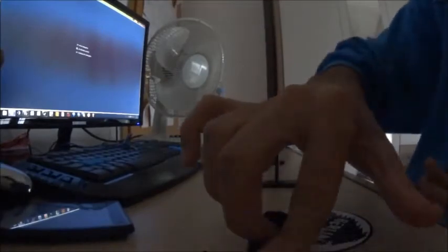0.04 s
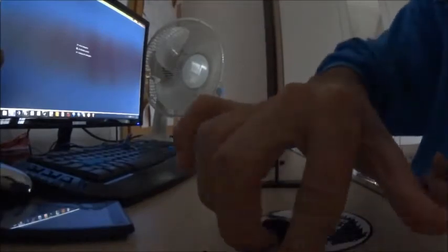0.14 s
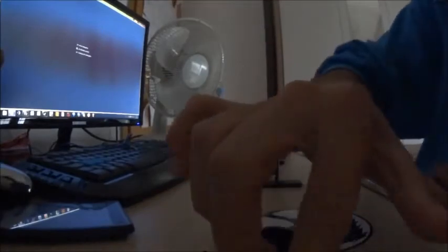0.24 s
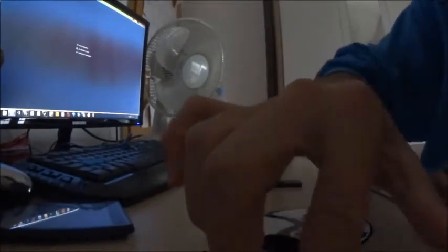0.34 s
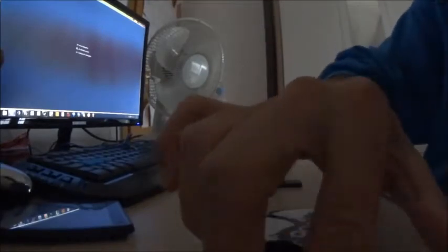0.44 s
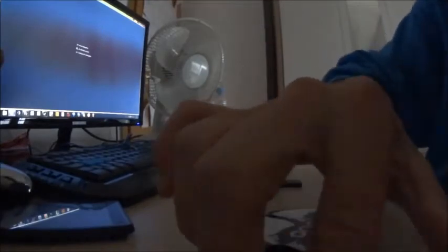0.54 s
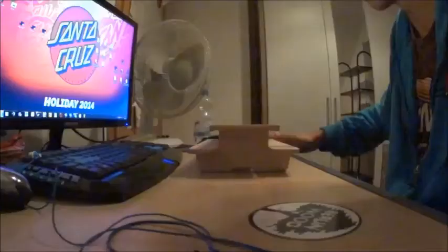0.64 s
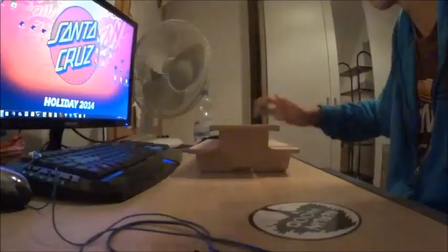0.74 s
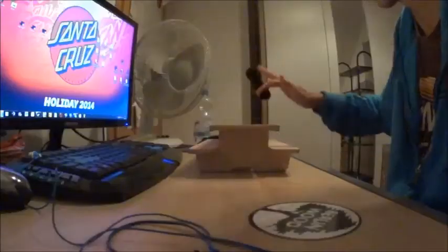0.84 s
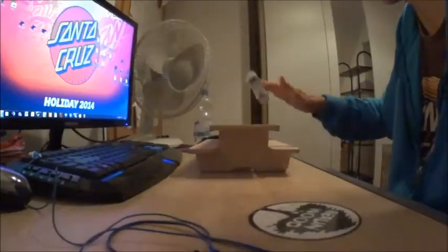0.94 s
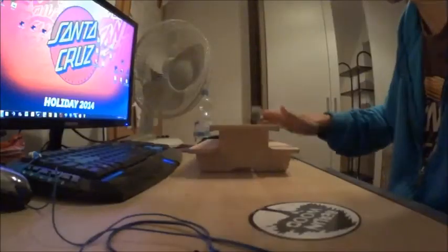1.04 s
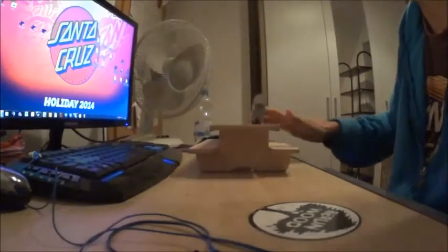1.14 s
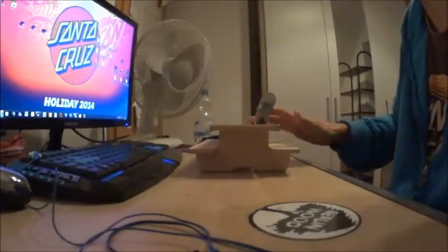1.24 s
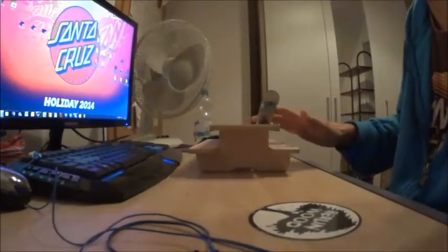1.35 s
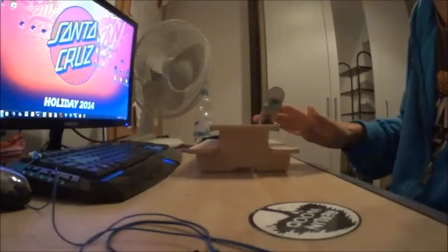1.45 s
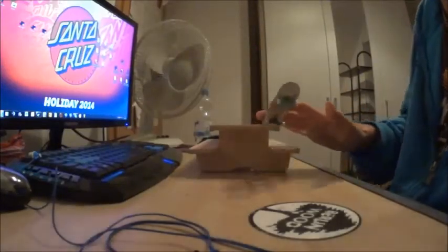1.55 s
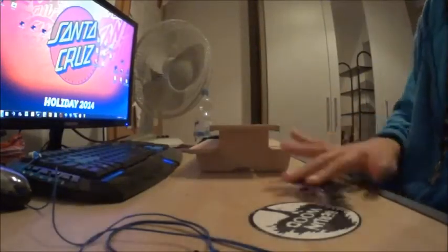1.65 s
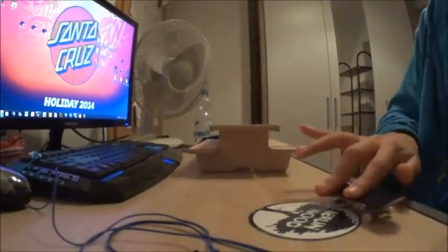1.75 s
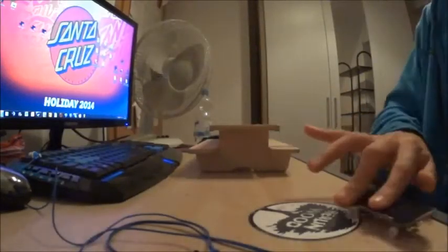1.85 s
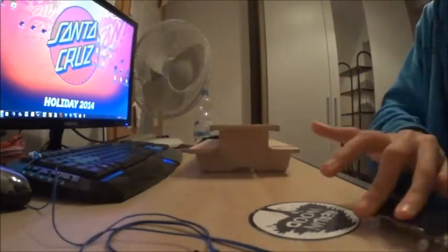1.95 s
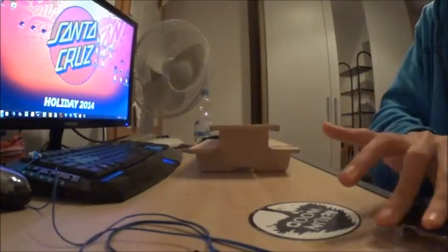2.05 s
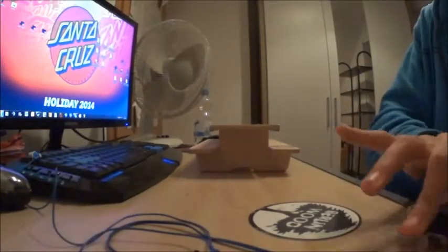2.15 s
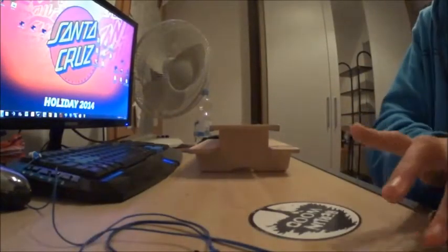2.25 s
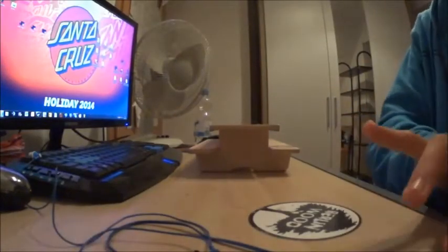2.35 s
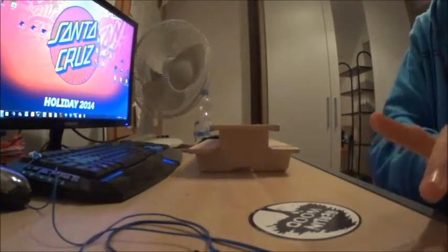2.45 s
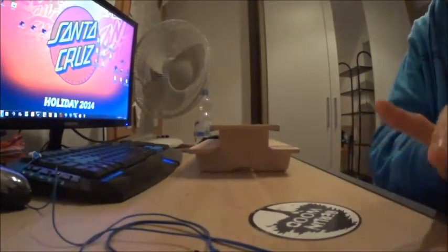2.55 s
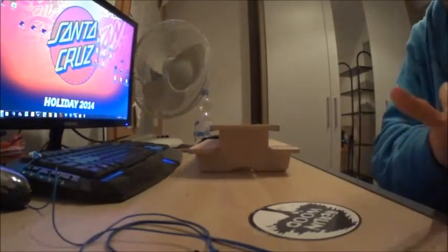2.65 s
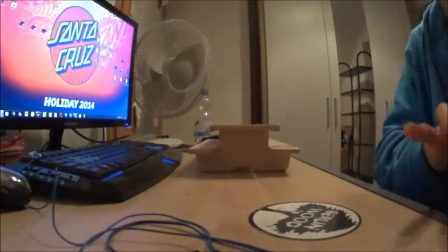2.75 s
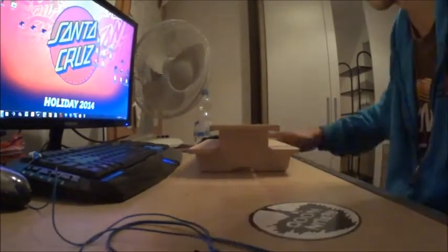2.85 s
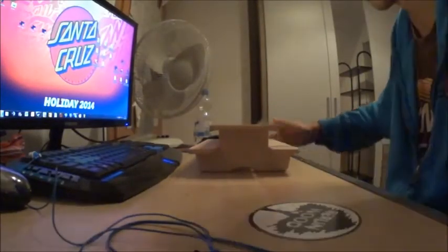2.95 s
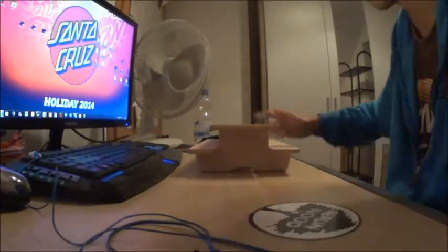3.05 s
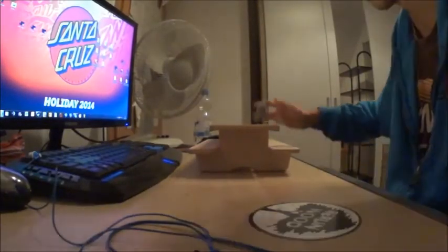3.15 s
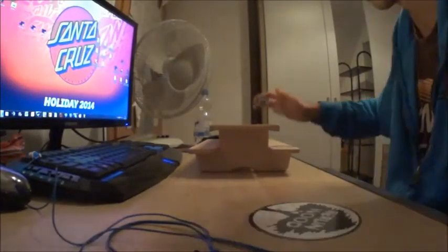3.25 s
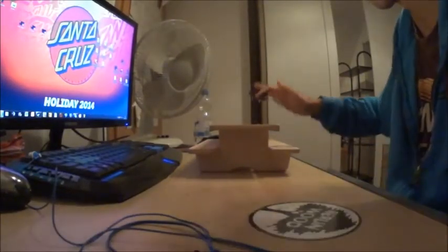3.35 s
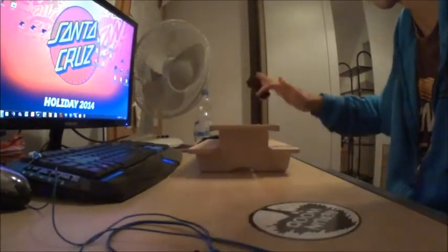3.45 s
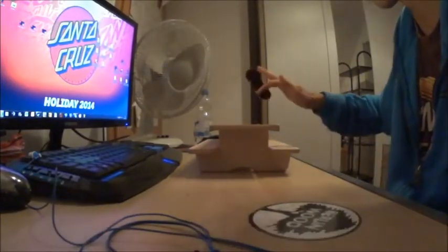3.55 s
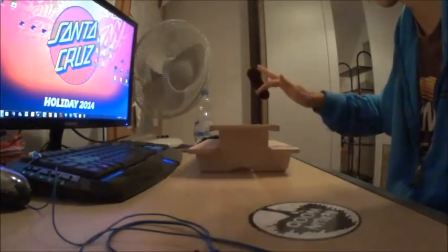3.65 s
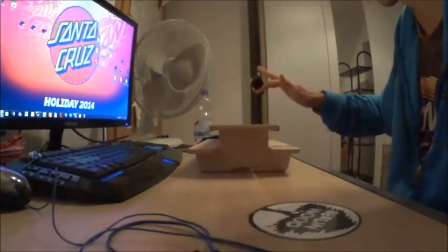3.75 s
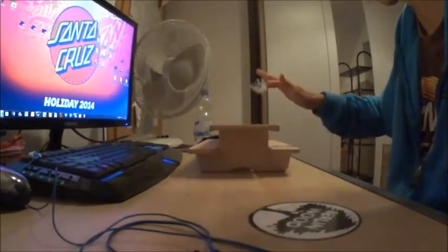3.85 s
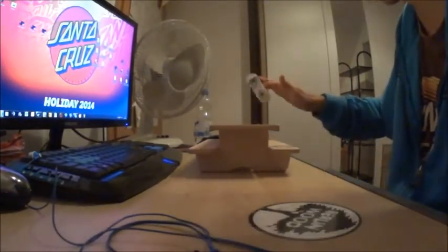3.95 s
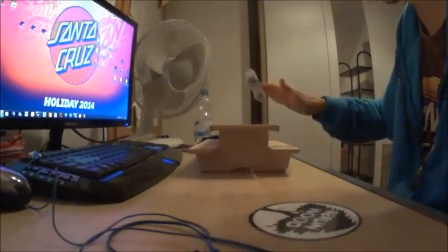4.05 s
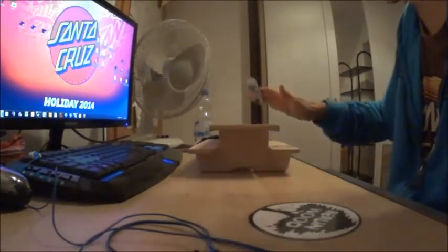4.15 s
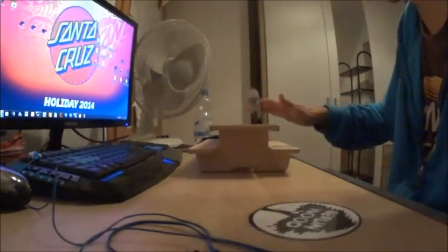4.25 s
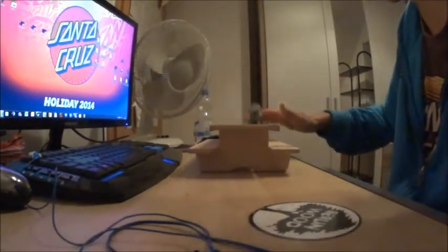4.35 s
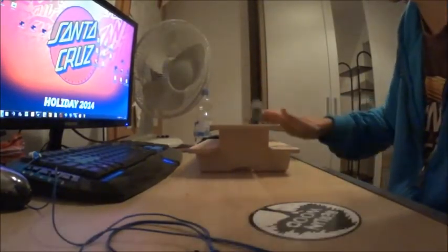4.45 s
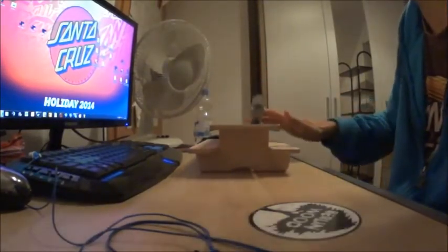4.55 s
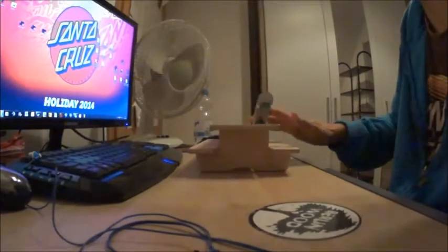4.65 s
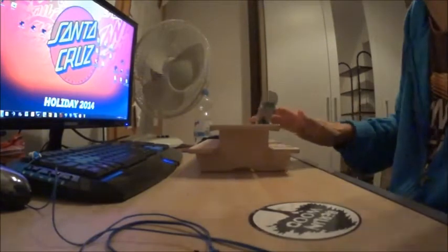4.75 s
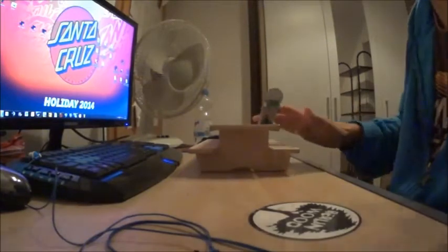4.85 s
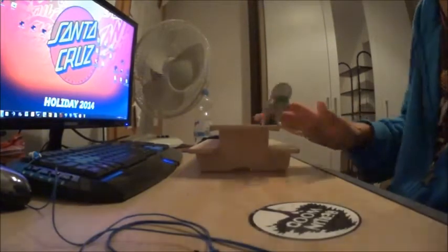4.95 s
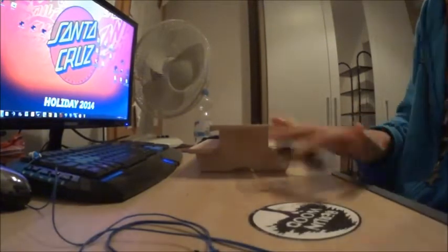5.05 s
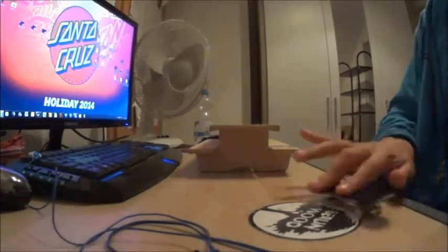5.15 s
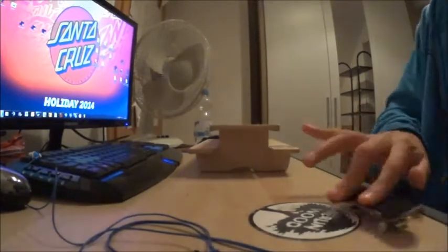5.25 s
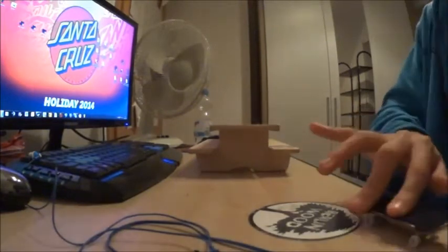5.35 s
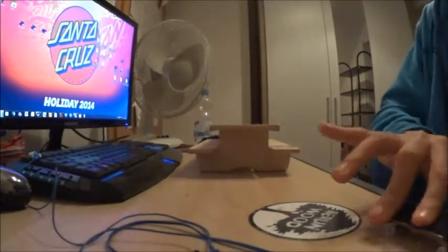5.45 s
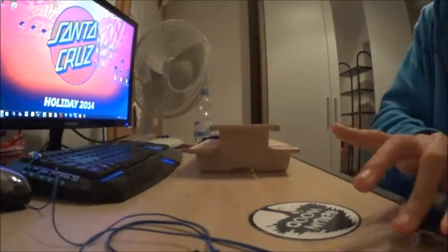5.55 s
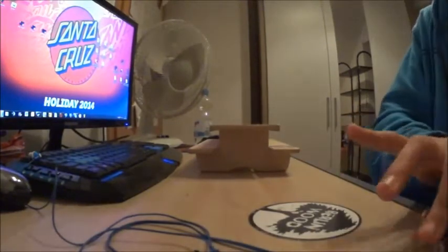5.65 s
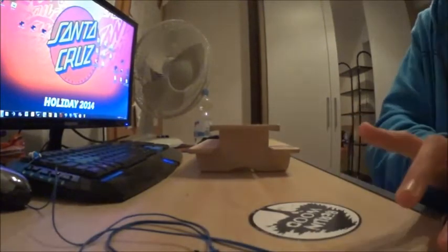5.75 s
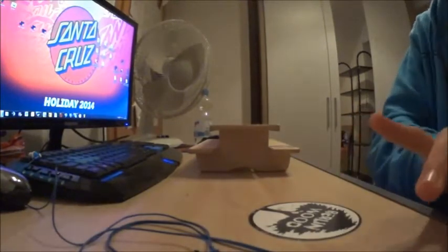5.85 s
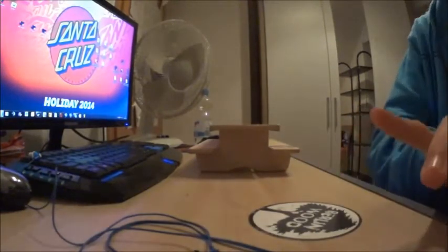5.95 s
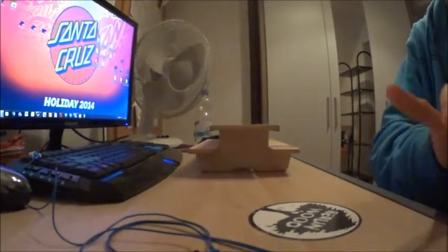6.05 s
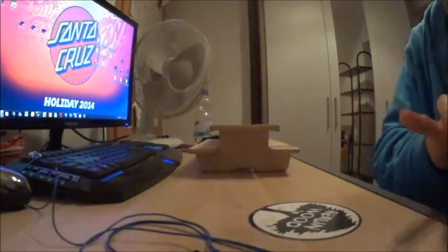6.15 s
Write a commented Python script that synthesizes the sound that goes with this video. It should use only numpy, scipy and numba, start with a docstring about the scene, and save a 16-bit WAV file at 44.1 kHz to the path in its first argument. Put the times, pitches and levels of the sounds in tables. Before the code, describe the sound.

A tiny finger skateboard hums close by on a wooden desk, then cracks, grinds and lands, before the blows repeat in deep slow motion.

```python
"""A finger skateboard on a wooden desk in a bedroom. The dying tail of an earlier blow opens; then the board rolls
close by: it hums, its bearings hiss and tick. After a cut it is popped onto a small wooden ledge, clacks, slides and
grinds off, lands and rolls away until a finger squeaks on it. An edit then repeats the first blows at quarter speed
and the rest at full speed. Blows are cracks and decaying modes; rolling, sliding and scraping are uneven noise through
resonances. A camera's limiter flattens the blows, so that the room swells behind them."""
import sys
import numpy as np
from scipy import signal
from scipy.fft import rfft, irfft
from scipy.io import wavfile
from scipy.ndimage import uniform_filter1d, minimum_filter1d
from numba import njit

SR = 44100
rng = np.random.default_rng(int(sys.argv[2]) if len(sys.argv) > 2 else 0)


def bounce(signal):
    """Save signal as a 16-bit WAV file at the path given by the first command-line argument."""
    frames = np.transpose(np.atleast_2d(signal))
    limited = np.clip(frames, -1, 1)
    pcm = np.round(limited * 32767).astype(np.int16)
    wavfile.write(sys.argv[1], SR, pcm)


N = 273861  # samples in the finished sound
LENGTH = 131072  # samples in the scene before the edit repeats parts of it

# Rumbling resonances of the desk. Each row: pitch in Hz, width in Hz, relative level in dB.
DESK_RUMBLE = [(102, 22, 2), (204, 57, 7), (319.5, 215, 12)]


def undb(db):
    """Turn decibels into a plain amplitude factor."""
    return 10 ** (np.asarray(db) / 20)


def unit(x):
    """Scale a sound to an rms (average strength) of 1."""
    return x / np.sqrt(np.mean(x ** 2))


def resonate(x, peaks):
    """A body favours some pitches: add up steep resonances (each passed twice), rms 1."""
    out = 0
    for hz, width, db in peaks:
        band = signal.iirpeak(hz, hz / width / 1.5, SR)
        twice = signal.lfilter(*band, signal.lfilter(*band, x))
        out = out + undb(db) / np.sqrt(width) * twice
    return unit(out)


def grit(lump_db, lump_hz=120):
    """Dense rough contact: noise whose force comes in short uneven lumps."""
    hold = int(SR / lump_hz)
    steps = np.repeat(rng.standard_normal(LENGTH // hold + 1), hold)
    lumps = uniform_filter1d(steps, hold)[:LENGTH]
    return rng.standard_normal(LENGTH) * undb(lump_db * lumps)


def strokes(rows):
    """Pressure that swells to a peak and lets go, for each row."""
    t = np.arange(LENGTH) / SR
    return sum(undb(db + np.minimum(swell * (t - s), fade * (s - t))) for s, db, swell, fade in rows)


def ring(modes, weight_db, signs, t):
    """A struck body rings in several modes, each a sine that dies away at its own pace."""
    hz, db, t60 = np.transpose(modes)[:, :, None]
    waves = np.sin(2 * np.pi * hz * t) * np.exp(-np.log(1000) * t / t60)
    strength = signs[:len(modes), None] * undb(db + weight_db)
    return np.sum(strength * waves, axis=0) / np.sqrt(len(modes))


def blows(spread_oct=0.77, crack_s=0.0024):
    """Each blow cracks and rings deck, desk and ledge; returns the direct sound and what spreads into the room."""
    # Each row: start in seconds, kind of contact, blow level in dB, favoured deck pitch in Hz,
    # crack level in dB relative to the blow.
    blow_rows = [(0.701, "clack", 4, 1200, -12), (0.7686, "pop", -7, 3100, 7.5),
                 (0.7802, "tick", -23, 2960, 15.5), (.792, "tick", -22, 3010, 12),
                 (.957, "tick", -56, 2000, 13), (.986, "tick", -51, 2000, 7.5),
                 (1.0855, "clack", -24, 1723, -0.5), (1.1335, "land", -9, 2970, 2.5),
                 (1.136, "land", 6, 1100, -14), (1.146, "clack", -4.5, 1000, -7),
                 (1.176, "land", -3, 1423, -1.5), (1.346, "clack", -3, 1741, -3),
                 (1.350, "axle", -18.5, 1970, 20), (1.387, "axle", -34, 1970, 10),
                 (1.5185, "axle", -28, 5120, 7.5), (1.618, "axle", -24, 2850, 12),
                 (1.6413, "land", -8.5, 3024, -0.5), (1.647, "axle", -16, 2850, 15),
                 (1.659, "axle", -21, 4890, 7.5), (1.674, "tick", -15.5, 2155, 5),
                 (1.7341, "land", 8.5, 1660, 1), (1.7404, "land", 1, 1492, -15.5),
                 (1.999, "clack", -33, 1204, 2.5), (2.486, "tick", -34, 1742, 8),
                 (2.491, "axle", -44, 8610, 14), (2.502, "axle", -44, 8695, 9),
                 (2.585, "tick", -50, 1900, 9), (2.6, "tick", -52, 1900, 12)]
    # For each kind of contact: ledge level and desk thud level in dB relative to the blow, crack pitch in Hz
    # (0: the favoured pitch), crack Q (high: it rings), level sent to the room in dB.
    contacts = {"pop": (1, -11, 8800, 1.33, -1), "land": (-38, -12.5, 6498.5, 1.16, 5.5),
                "clack": (-27, -24, 6000, 1.16, -1.5), "tick": (-19.5, -23.5, 9200, 2.5, -3),
                "axle": (-30, -23.5, 0, 25, -4.5)}
    # Modes of the board's deck, the ledge and the desk top.
    # Each row: pitch in Hz, relative level in dB, time to fade by 60 dB in seconds.
    deck_modes = [(817, 1, 0.025), (1017, -8, 0.046), (1223, 4.5, 0.016), (1480, 2, 0.012),
                  (1729, 3.5, 0.012), (1970, 2.5, 0.019), (2526, 6, 0.0092), (2955, 7.5, 0.011),
                  (3500, 5, 0.013), (5230, -33.5, .02)]
    ledge_modes = [(105, -30.5, 0.45), (181.4, -23.5, 0.18), (352, -2.5, 0.23), (400, -11, .12),
                   (508, -3, 0.045)]
    thud_modes = [(231, -12.5, .04), (427, -1.5, .02), (661, 2.5, .016)]
    ledge_room_db = -10.5  # the ledge sends less into the room

    direct, spread = np.zeros(LENGTH), np.zeros(LENGTH)
    t = np.arange(8192) / SR
    for s, contact, blow_db, deck_hz, crack_db in blow_rows:
        ledge_db, thud_db, crack_hz, q, room_db = contacts[contact]
        # no two blows excite the modes alike
        signs = undb(1.5 * rng.standard_normal(16)) * rng.choice([-1, 1], 16)
        noise = rng.standard_normal(len(t))

        # deck modes far from the favoured pitch are weaker
        octaves_off = np.log2(np.array(deck_modes)[:, :1] / deck_hz)
        favour_db = -6 * (octaves_off / spread_oct) ** 2
        deck = ring(deck_modes, favour_db, signs, t)
        deck += ring(thud_modes, thud_db, signs, t)
        ledge = ring(ledge_modes, ledge_db, np.abs(signs), t)

        colour = signal.iirpeak(min(crack_hz or deck_hz, 11000), max(q, .5), SR)
        crack_db += 10 * np.log10(q)  # a narrow ring takes less of the blow's band
        crack = undb(crack_db) * signal.lfilter(*colour, noise * np.exp(-t / crack_s))
        # summed over all directions the crack has an even spectrum: one click of the same energy
        click = undb(crack_db) * signal.lfilter(*colour, t == 0) * np.sqrt(crack_s * SR / 2)

        here = slice(int(s * SR), int(s * SR) + len(t))
        direct[here] += (deck + ledge + crack) * undb(blow_db)
        spread[here] += (deck + undb(ledge_room_db) * ledge + click) * undb(blow_db + room_db)
    return direct, spread


def gains(tables, fade_s=0.03):
    """Gain of the first level and of the level relative to it; each table fades in before it and out after it."""
    t, out = np.arange(LENGTH) / SR, 0
    for table in tables:
        s, main_db, rel_db = np.transpose(table)
        inside = np.clip(np.minimum(t - s[0], s[-1] - t) / fade_s + 1, 0, 1)
        out = out + inside * undb([np.interp(t, s, db) for db in (main_db, main_db + rel_db)])
    return out


def rolling():
    """Rolling or sliding, the board hums, its bearings hiss, whine and tick, the desk top rumbles."""
    # One table for each stretch: rolling close by, sliding along the ledge, rolling away.
    # The first opens on the dying tail of an earlier blow, then the wheels hum.
    # Each row: time in seconds, hum in dB, hiss in dB relative to the hum.
    stretches = [
        [(0.0, -32, -8.5), (0.04, -43.5, -8.5), (0.265, -46, -5.5), (0.28, -46.5, 0.5), (0.425, -44.5, -0.5),
         (0.46, -58.5, -3), (0.67, -62, -4.5)],
        [(1.2, -21.5, -5), (1.34, -35, -13), (1.352, -26.5, -10.5), (1.5, -48, -4)],
        [(1.9, -33.5, -6), (1.99, -40.5, -17), (2.08, -40.5, -17), (2.47, -49, -25), (2.5, -43.5, -22),
         (2.6, -53, -2), (2.7, -69.5, -20)],
    ]
    # Resonances of the hum, the bearing hiss, the bearing whine and the bearing ticks.
    # Each row: pitch in Hz, width in Hz, relative level in dB.
    hum_peaks = [(730, 270, -1.5), (887, 180, -1.5), (1050, 140, 1.5), (1180, 240, -1.5), (1818, 500, -5),
                 (3100, 640, -13)]
    hiss_peaks = [(3650, 610, 16.5), (5740, 450, 18.5), (7180, 1700, 21), (5000, 5500, -13.5)]
    whine_peaks = [(8630, 700, 21), (10200, 4500, -25)]
    tick_peaks = [(3600, 1400, -8), (5750, 1400, 3), (9500, 3500, -1)]
    # Bearing ticks. Each row: start in seconds, peak level in dB.
    tick_rows = [(0.1208, -32), (0.2768, -37), (0.3611, -34), (0.4394, -37.5), (0.5171, -32), (0.5635, -40),
                 (0.603, -40.5)]
    rumble_db, whine_db = -7.5, -21  # relative to the hum

    hum, hiss = gains(stretches)
    rumble, whine = undb(rumble_db) * hum, undb(whine_db) * hum
    out = hum * resonate(grit(3.5), hum_peaks)
    out += rumble * resonate(grit(1.5), DESK_RUMBLE)
    out += hiss * resonate(grit(3.), hiss_peaks)
    out += whine * resonate(grit(2.), whine_peaks)

    tick = resonate(np.arange(512) == 0, tick_peaks)  # a single click, rung
    for s, db in tick_rows:
        out[int(s * SR):int(s * SR) + len(tick)] += undb(db) * tick / tick.max()
    return out


def grinding():
    """Metal trucks (axle holders) scrape the ledge ever harder until they slip off; one rough drag excites all."""
    # Each row: peak time in seconds, peak level in dB, swell in dB per second, fade in dB per second.
    grind_rows = [(1.638, -17, 143.5, 271)]
    # Resonances of the trucks and of their hiss. Each row: pitch in Hz, width in Hz, relative level in dB.
    truck_peaks = [(1100, 840, 11.5), (1443, 300, -2.5), (1924, 110, 4.5), (2130, 320, -6.5),
                   (2850, 400, 1), (3380, 280, -11.5), (2000, 3100, 6.5)]
    truck_hiss_peaks = [(5100, 3200, -0.5), (9440, 6100, 0.5)]
    hiss_db, rumble_db = -12.5, -10.5  # relative to the scrape

    drag = grit(4., lump_hz=220)
    trucks = resonate(drag, truck_peaks)
    trucks = trucks + undb(hiss_db) * resonate(drag, truck_hiss_peaks)
    trucks = trucks + undb(rumble_db) * resonate(drag, DESK_RUMBLE)
    return strokes(grind_rows) * trucks


def scuffing():
    """A finger stops the board: on the grip tape it squeaks in narrow bands and rubs in wide ones."""
    # Each row: peak time in seconds, peak level in dB, swell in dB per second, fade in dB per second.
    scuff_rows = [(2.489, -44, 3000, 900), (2.52, -44, 1800, 800), (2.56, -44, 1200, 250),
                  (2.585, -41, 400, 700)]
    # Resonances of squeak and rub. Each row: pitch in Hz, width in Hz, relative level in dB.
    squeak_peaks = [(1590, 230, -7), (1863, 70, 3), (2074, 250, -8)]
    rub_peaks = [(3540, 1000, 6), (5900, 4400, 4.5), (9500, 3700, -4)]

    squeak = resonate(grit(2.), squeak_peaks)
    rub = undb(-8) * resonate(grit(4.), rub_peaks)
    return strokes(scuff_rows) * (squeak + rub)


def pair(length, like):
    """Left and right noises that share a part: 0 is unrelated, 1 is the same."""
    both, apart = rng.standard_normal((2, length))
    like = np.clip(like, 0, 1)
    return np.sqrt(1 + like) * both + np.sqrt(1 - like) * apart * np.array([[1], [-1]])


def room(gap_s=0.00086, build_s=0.0019, patchy_db=3.0, even_s=0.066):
    """Octave by octave, echoes build up after the first wall and die away."""
    # Each row: middle of the octave in Hz, time to fade by 60 dB in seconds, relative tail level in dB,
    # likeness of left and right from 0 to 1.
    octaves = [(59.4, 0.14, -2, 0.93), (125.4, 0.8, -2.5, 0.95), (252, 0.34, -0.5, 0.9),
               (540, 0.32, 3.5, 0.86), (1000, 0.42, 1, 0.7), (2000, 0.41, 0, 0.6), (3940, 0.38, 1, 0.7),
               (7930, 0.32, -1.5, 0.7)]
    t, tail = np.arange(32768) / SR, 0
    build = 1 - np.exp(-np.maximum(t - gap_s, 0) / build_s)
    # early echoes arrive as separate slaps, later ones merge
    slaps = np.repeat(rng.standard_normal(len(t) // 64), 64)
    build *= undb(patchy_db * slaps * np.exp(-t / even_s))
    for hz, t60, db, like in octaves:
        # the highest band reaches up to 16 kHz
        edges = [hz / np.sqrt(2), hz * np.sqrt(2) if hz < 6000 else 16000]
        bandpass = signal.butter(2, edges, "band", fs=SR, output="sos")
        band = signal.sosfilt(bandpass, build * pair(len(t), like))
        decay = np.exp(-np.log(1000) * t / t60)
        tail = tail + band * undb(db) * decay * np.sqrt(np.log(1000) / t60 / SR)
    return tail


def air():
    """Steady room tone: shaped noise, alike on both sides in the bass."""
    # Spectrum of the room tone. Each row: pitch in Hz, relative level in dB per Hz.
    spectrum = np.array([(18, -55), (30, -9), (206, -11.5), (239, -6.5), (298, -9), (443, -7), (642, -5),
                         (709, -14), (11000, -30), (14300, -47.5), (22000, -120)])
    level_db = -51

    hz = np.fft.rfftfreq(LENGTH, 1 / SR)[1:]
    both, apart = rfft(rng.standard_normal((2, LENGTH)))[:, 1:]
    apart = apart * np.clip(hz / 900, .15, .6)
    shape = undb(np.interp(np.log(hz), np.log(spectrum[:, 0]), spectrum[:, 1]))
    sides = shape * np.array([both + apart, both - apart])
    sides = np.pad(sides, ((0, 0), (1, 0)))  # nothing at 0 Hz
    return undb(level_db) * unit(irfft(sides))


def ports(heard):
    """The camera body shades the right microphone port and delays its middle range."""
    # Each row: pitch in Hz, lead of the left port in radians, how much louder the left port is in dB.
    port_rows = [(60, 0.1, 1.2), (300, 0.81, 1.4), (800, 0.82, 1.3), (2100, 0.98, 1.5), (3360, 0.4, 1.5),
                 (6000, 0.2, 0.2), (10910, .15, 0.4)]
    hz, lead, louder_db = np.transpose(port_rows)
    at = np.log(np.fft.rfftfreq(LENGTH, 1 / SR) + 1)
    louder = undb(np.interp(at, np.log(hz), louder_db) / 2)
    # each port takes half of the contrast
    half = louder * np.exp(.5j * np.interp(at, np.log(hz), lead))
    return irfft(rfft(heard) * [half, 1 / half])


def scene():
    """The desk as it sounded, in its own time."""
    roll_room_db, scrape_room_db = -4.5, -7  # sent into the room
    direct, spread = blows()
    roll = rolling()
    scrape = grinding() + scuffing()
    spread = spread + undb(roll_room_db) * roll + undb(scrape_room_db) * scrape
    echoes = signal.fftconvolve(spread[None], room())[:, :LENGTH]
    heard = ports(direct + roll + scrape + echoes + air())
    return np.pad(heard, ((0, 0), (0, N - LENGTH)))


@njit
def hold_peaks(x, fall):
    """Rises at once, sinks by a factor each sample."""
    y, e = np.empty(len(x)), 1e-9
    for i in range(len(x)):
        e = max(x[i], e * fall)
        y[i] = e
    return y


def limit(x):
    """Both channels are turned down just ahead of each peak and let up again quickly."""
    limit_db, ratio, ahead_s, release_s = -5.5, 15., .002, .007
    ahead = int(ahead_s * SR)
    peak = -minimum_filter1d(-np.abs(x).max(axis=0), 2 * ahead + 1)
    held = hold_peaks(peak, np.exp(-1 / (release_s * SR)))
    over = np.maximum(held / undb(limit_db), 1)
    return x * np.exp(uniform_filter1d(-np.log(over), ahead) * (1 - 1 / ratio))


def record(dry):
    """Limiter and the camera's top, then the cuts; slow play lowers every pitch with the speed."""
    # Each row: start in seconds, end in seconds, scene time at the start in seconds, speed (1 is normal).
    # Between the rows there is silence.
    edit = [(0, .6715, 0, 1), (.7373, 2.841, .7373, 1), (2.8727, 4.5767, .73817, .25),
            (4.5767, 6.3, 1.17677, 1)]
    top_hz, bottom_hz = 11000, 45
    top = signal.ellip(12, .2, 80, top_hz, fs=SR, output="sos")
    bottom = signal.butter(2, bottom_hz, "high", fs=SR, output="sos")
    tape = signal.sosfilt(top, limit(signal.sosfilt(bottom, dry[:, :LENGTH])))
    out = np.zeros_like(dry)
    for start, end, source, speed in edit:
        a, b = int(start * SR), min(int(end * SR), N)
        slow = int(1 / speed)
        played = signal.resample_poly(tape, slow, 1, axis=1, window=("kaiser", 9.))
        first = int(source * SR * slow)
        out[:, a:b] = played[:, first:first + b - a]
    # nothing above 16 kHz, not even from the cuts
    return signal.sosfilt(signal.ellip(8, .1, 70, 16000, fs=SR, output="sos"), out)


dry = scene()
out = record(dry)
bounce(out)
```